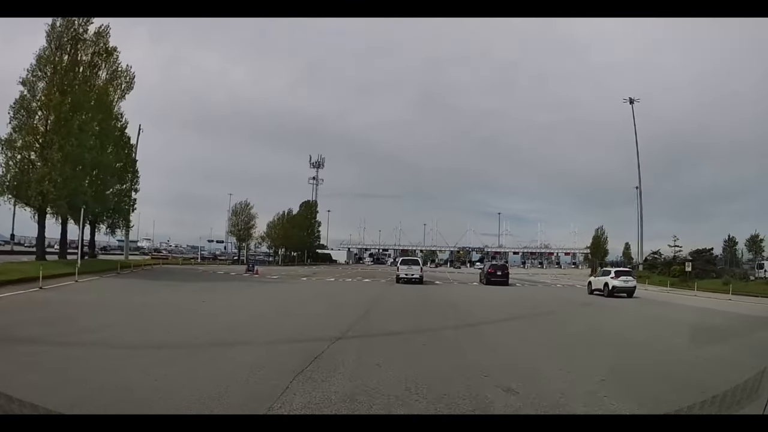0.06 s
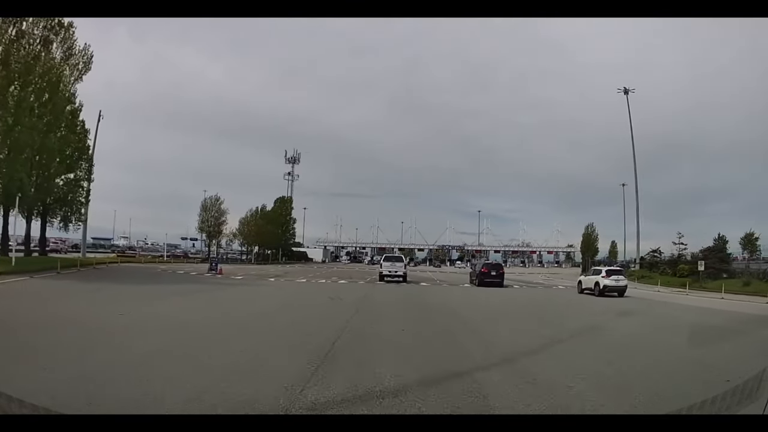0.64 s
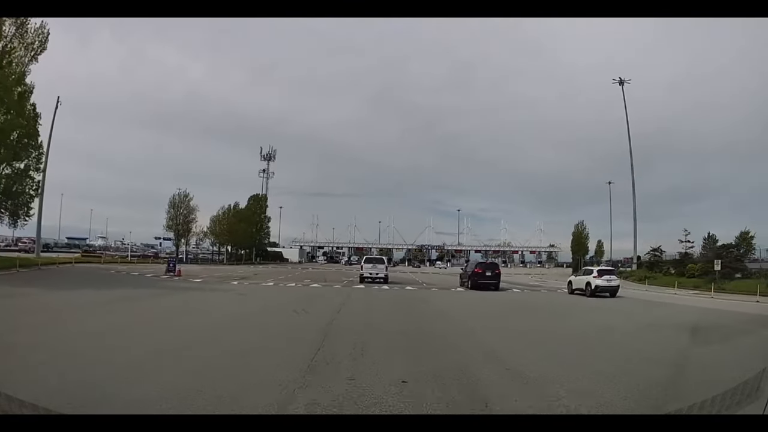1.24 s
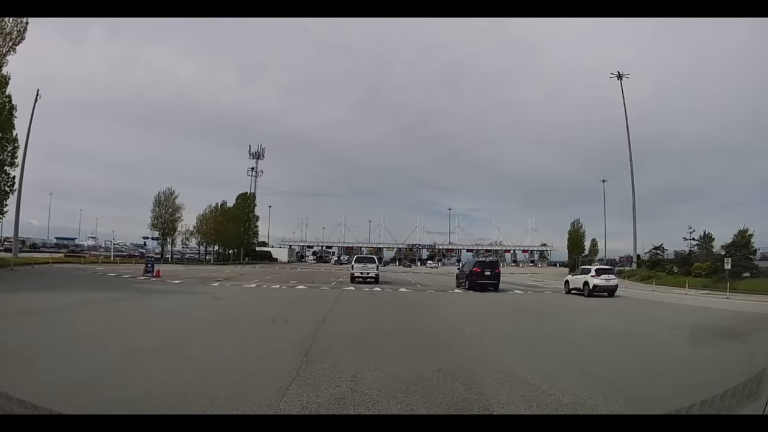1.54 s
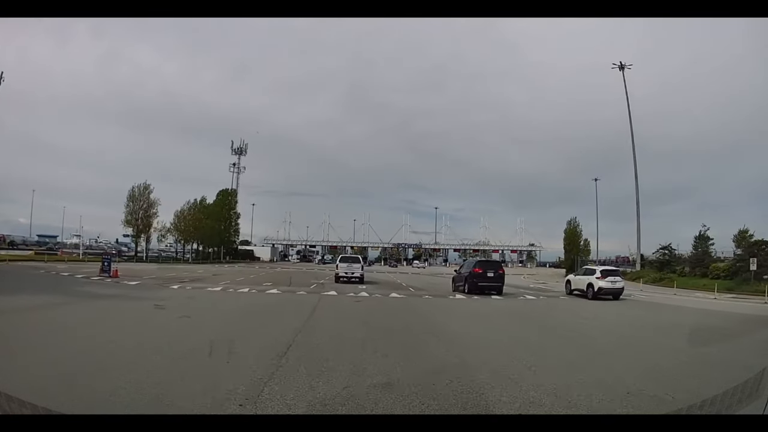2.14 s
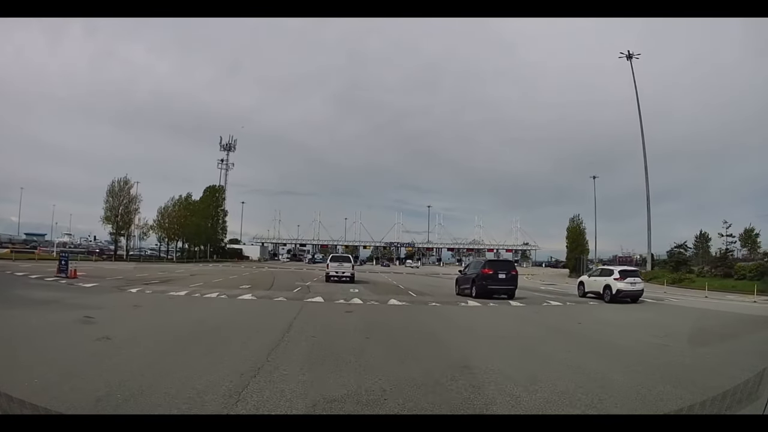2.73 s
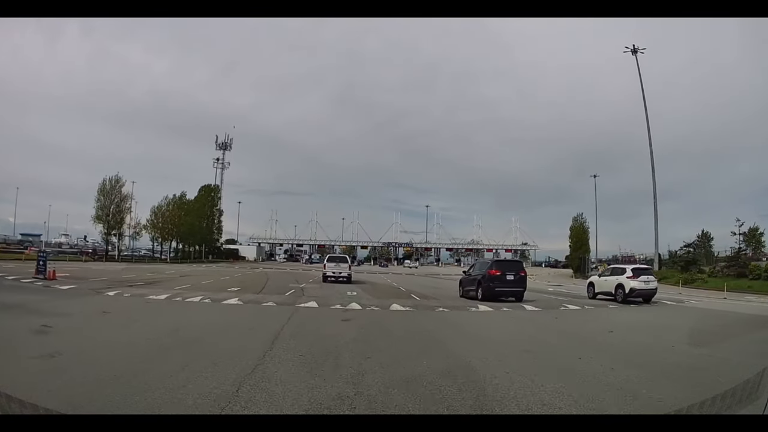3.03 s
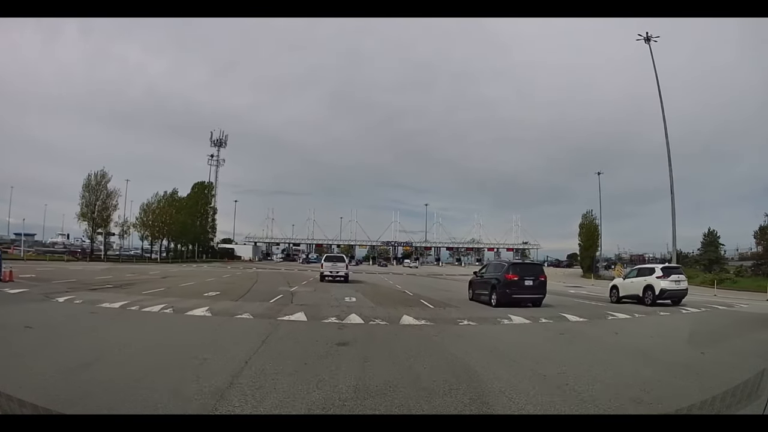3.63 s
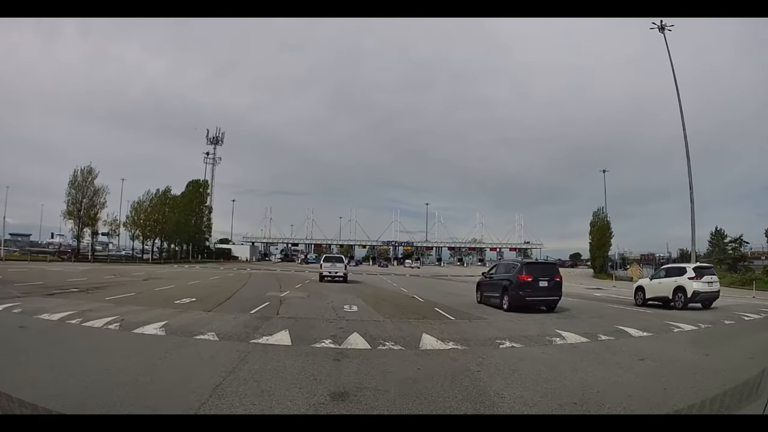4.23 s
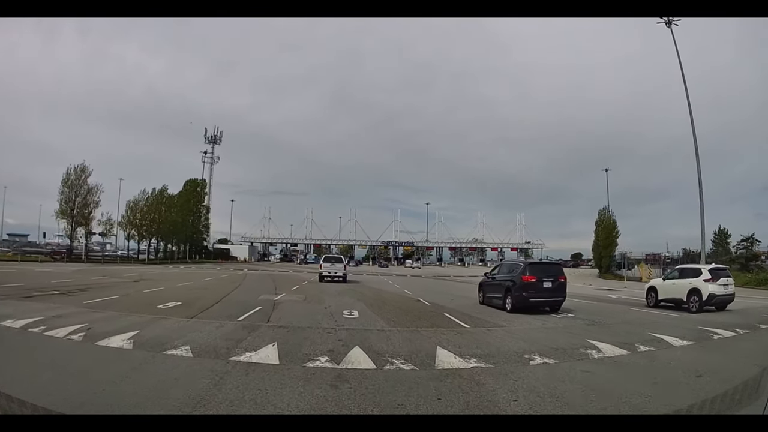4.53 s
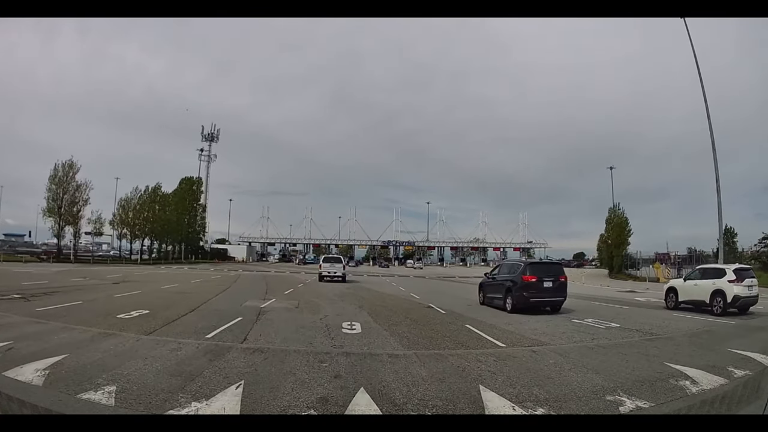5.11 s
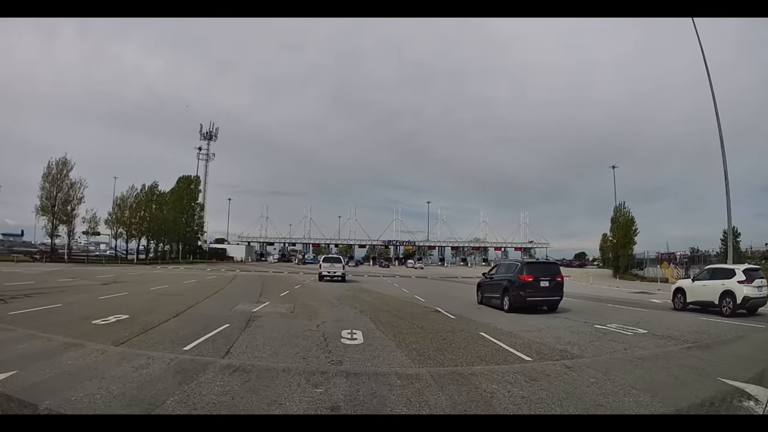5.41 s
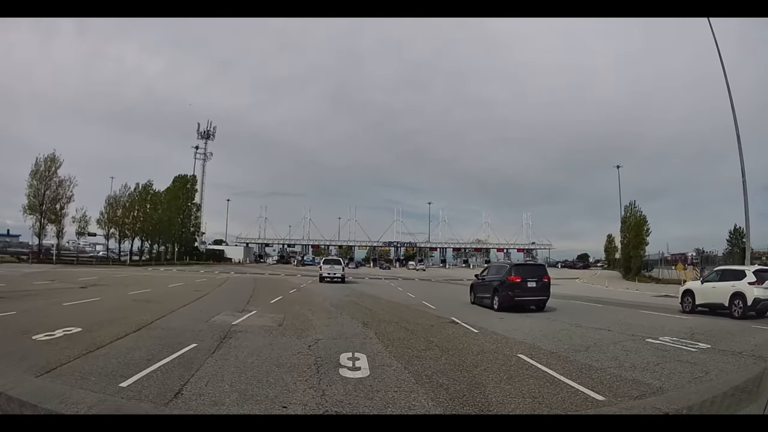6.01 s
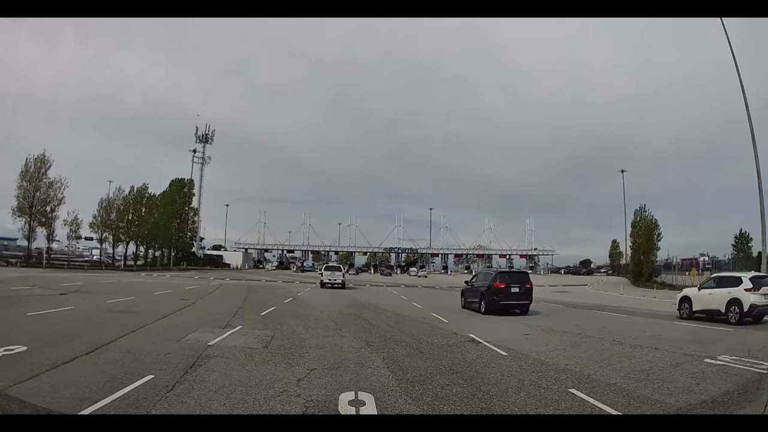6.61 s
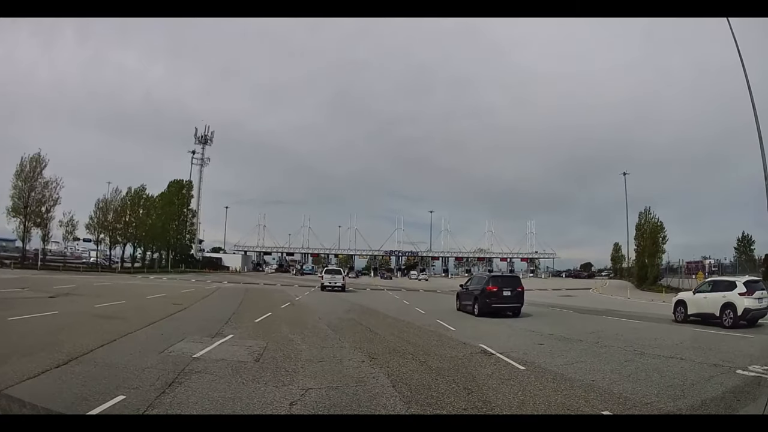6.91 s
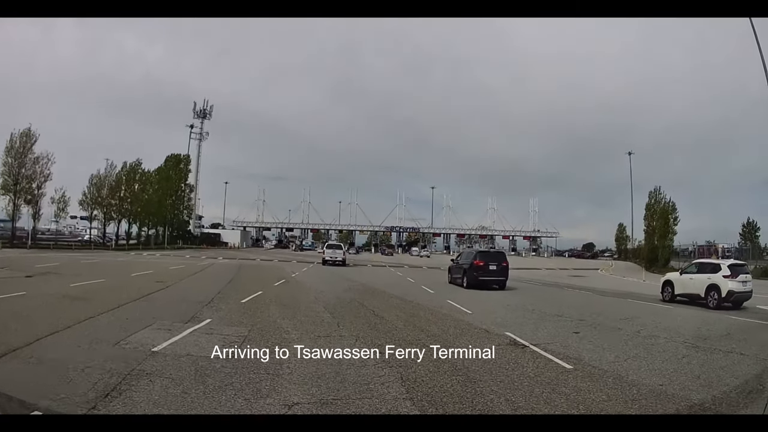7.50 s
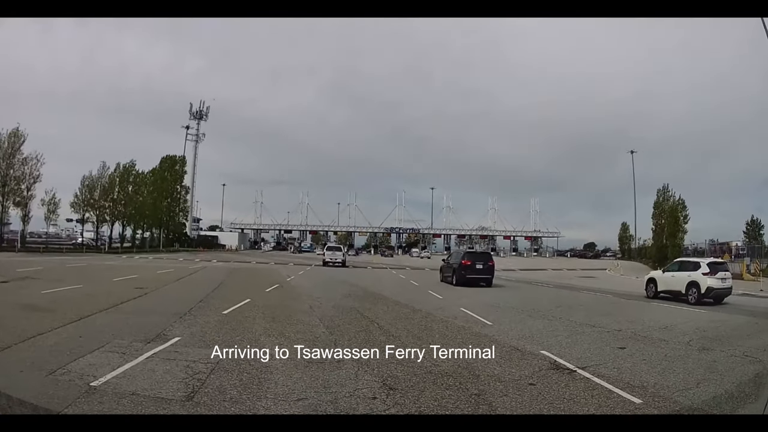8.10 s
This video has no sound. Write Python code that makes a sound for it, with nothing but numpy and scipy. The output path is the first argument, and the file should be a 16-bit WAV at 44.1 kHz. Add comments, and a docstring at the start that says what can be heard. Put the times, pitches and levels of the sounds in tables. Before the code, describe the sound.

Inside a slowing car, road rumble and tyre roar continue, with early bumps and trim rattles and a late booming ridge crossing.

```python
"""Inside a car on worn pavement.

The road rumbles through the body and roars in the tread, over an engine hum and a hiss of air. Bumps on a rough
opening stretch jolt the cabin: trim rubs and loose fittings rattle. A faint gear whine sinks as the car slows.
Late on the whine flares briefly into a husky squeal, then front and rear tyres cross a ridge and their air
booms."""
import sys
import numpy as np
from scipy import signal
from scipy.fft import rfft, irfft, next_fast_len
from scipy.io import wavfile
from scipy.ndimage import map_coordinates

SR = 44100
rng = np.random.default_rng(int(sys.argv[2]) if len(sys.argv) > 2 else 0)


def master_out(mix):
    """Clip the mix to full scale and print it as 16-bit PCM to the path in sys.argv[1]."""
    frames = np.transpose(np.atleast_2d(mix))
    ceiling = np.clip(frames, -1, 1)
    pcm = np.round(ceiling * 32767).astype(np.int16)
    wavfile.write(sys.argv[1], SR, pcm)


N = 368235
TIME = np.arange(N) / SR


def undb(db):
    """Decibels to gain."""
    return 10 ** (np.asarray(db) / 20)


def unit(x):
    """Scale to rms 1."""
    return x / np.sqrt(np.mean(x ** 2))


def curves(table):
    """Interpolate each column over the times in the first, one value a sample."""
    times, *columns = np.transpose(table)
    return [np.interp(TIME, times, column) for column in columns]


def shaped(x, response):
    """Filter by a gain that is a function of frequency; rms 1."""
    size = next_fast_len(N + SR // 2)
    hz = np.maximum(np.arange(size // 2 + 1) * SR / size, 1)
    return unit(irfft(rfft(x, size) * response(hz), size)[:N])


def noise(colour):
    """Noise with a spectrum of (Hz, dB) points; rms 1."""
    hz, db = np.transpose(colour)
    return shaped(rng.standard_normal(N), lambda f: undb(np.interp(np.log(f), np.log(hz), db)))


def walk(rate_hz):
    """Smooth random drift; rms 1."""
    return noise([(rate_hz / 2, 0), (rate_hz, -6), (4 * rate_hz, -90)])


def even(x, span_s):
    """Flatten swells slower than the span; rms 1."""
    power = signal.fftconvolve(x ** 2, signal.windows.hann(max(int(span_s * SR), 8)), "same")
    return unit(x / np.sqrt(np.abs(power) + 1e-9))


def bell(peak_s, half_s):
    """Gaussian swell and fall."""
    return np.exp(-.5 * ((TIME - peak_s) / half_s) ** 2)


def phase(hz):
    """Running phase of a moving frequency, in radians."""
    return 2 * np.pi * np.cumsum(hz) / SR


def tone(hz, waver):
    """Sine whose pitch wavers by a fraction; rms 1."""
    return np.sqrt(2) * np.sin(phase(hz * (1 + waver * walk(39.2))))


# Pavement coarseness. Each row: time in seconds, dB above ordinary asphalt.
COARSENESS = [(0, 9), (0.5, 9), (0.57, 4.5), (0.68, 7.5), (1.0, 4.5), (1.35, 0.5), (2.15, 0), (2.3, -1),
              (2.45, 0.5), (3.45, -1), (3.9, -1), (4.03, -2.5), (4.18, -1), (4.44, -1), (4.5, -3),
              (4.6, -0.5), (5.1, -2), (5.7, -0.5), (5.98, -3.5), (6.2, 2), (6.55, -4), (6.8, 1.5), (7.3, 2),
              (7.8, 7), (8.02, -2), (8.12, 2), (8.35, -2)]
# Cabin hiss spectrum. Each row: frequency in Hz, density in dB.
AIR_SPECTRUM = [(500, 9), (1500, 3.5), (2400, 0), (3100, 0.5), (4000, 0), (5500, -0.4), (7000, -1.5),
                (9000, -5), (12000, -11), (15500, -13)]


def air(level_db=-53):
    """Air hisses in the cabin, a touch louder over coarse pavement."""
    coarse_db, = curves(COARSENESS)
    return noise(AIR_SPECTRUM) * undb(level_db + 0.17 * coarse_db)


# Engine and accessory tones. Each row: frequency in Hz, level in dB.
HUM_TONES = [(87, -66), (108, -55.5), (455, -63), (1005, -67.5), (1044, -69.5)]


def engine_hum(flutter_db=2.5, waver_hz=7):
    """The engine and its accessories hum, each tone wavering in level and pitch."""
    return np.sqrt(2) * sum(undb(db + flutter_db * walk(7)) * np.sin(phase(hz + waver_hz * walk(7.46)))
                            for hz, db in HUM_TONES)


# Road speed as gear pitch. Each row: time in seconds, mesh frequency in Hz.
GEAR_PITCH = [(2.0, 1410), (2.4, 1340), (2.6, 1326), (2.76, 1305), (2.95, 1334), (3.15, 1350), (3.35, 1380),
              (3.72, 1305), (4.0, 1265), (4.5, 1210), (5.6, 1142), (6.75, 1094), (8.35, 1034)]
# Gear whine. Each row: time in seconds, level in dB.
WHINE_LEVEL = [(0, -79), (1.9, -73), (2.25, -65), (2.58, -59), (2.78, -65), (3.05, -67), (3.3, -72),
               (3.6, -62), (3.95, -70), (4.3, -73), (8.35, -67)]


def gear_whine(flutter_db=2.9, waver_hz=11):
    """Meshing gears whine thinly, gliding with the road speed."""
    mesh_hz, = curves(GEAR_PITCH)
    level_db, = curves(WHINE_LEVEL)
    gain = undb(level_db + flutter_db * walk(10))
    return np.sqrt(2) * gain * np.sin(phase(mesh_hz + waver_hz * walk(56)))


def gear_squeal(centre_hz=1092, width_hz=50, level_db=-57.5):
    """The gear whine flares briefly into a husky squeal at the mesh pitch."""
    band = shaped(rng.standard_normal(N), lambda f: 1 / (1 + (2 * (f - centre_hz) / width_hz) ** 2))
    return undb(level_db) * bell(peak_s=6.83, half_s=0.08) * even(band, span_s=0.087)


# Body rumble, tyre drone and tread roar spectra. Each row: frequency in Hz, density in dB.
RUMBLE_SPECTRUM = [(20, -22), (35, -12.5), (60, -4), (85, -1), (110, 1), (140, -5.5), (175, -4.5),
                   (260, -53), (2000, -103)]
DRONE_SPECTRUM = [(100, -35), (165, 0), (200, 1.5), (238, 3), (275, -4), (330, -5.5), (400, -16.5),
                  (700, -20.5), (3000, -90)]
TREAD_SPECTRUM = [(200, -14), (380, -1), (465, 12), (570, 2.5), (700, 7.5), (800, 8), (910, 2), (1030, 3),
                  (1200, 0.5), (1500, -13), (2500, -14), (8000, -41)]


def road(cruise_gear_hz=1435, patchy_db=1.5):
    """Pavement grain shakes the body, drones in the tyres' air and roars in the tread, more at speed."""
    gear_hz, = curves(GEAR_PITCH)
    coarse_db, = curves(COARSENESS)
    speed = gear_hz / cruise_gear_hz
    rumble = even(noise(RUMBLE_SPECTRUM), span_s=0.22) * undb(-38.5 + coarse_db) * speed ** 2.12
    drone = even(noise(DRONE_SPECTRUM), span_s=0.21) * undb(-43 + coarse_db) * speed ** 2.04
    roar = noise(TREAD_SPECTRUM) * undb(-53.5 + 0.87 * coarse_db + patchy_db * walk(29)) * speed ** 0.82
    return rumble + drone + roar


# Loose fittings. Each row: start in seconds, knock level in dB, knock decay in seconds,
# tick level in dB, tick decay in seconds.
RATTLE_HITS = [(0.21, -39.5, 0.033, -52, 0.012), (0.258, -40, 0.032, -62, 0.01),
               (0.277, -39, 0.016, -40, 0.014), (0.303, -31.5, 0.011, -58, 0.012),
               (0.327, -45, 0.015, -55, 0.0065), (7.547, -46, 0.012, -48, 0.014),
               (7.766, -54, 0.03, -62, 0.02), (8.211, -51, 0.02, -48, 0.016)]
# Knock and tick spectra. Each row: frequency in Hz, density in dB.
KNOCK_SPECTRUM = [(500, -42), (1000, 21), (1300, 13), (1600, 7), (2100, 0), (3200, -46), (8000, -47)]
TICK_SPECTRUM = [(1200, -21), (2400, -7), (3100, 2.5), (3800, -3), (5400, -3), (7000, -18), (9000, -12),
                 (14000, -42)]


def rattles(chatter_db=1.0, chatter_hz=400, attack_s=0.0041):
    """Jolted fittings chatter briefly: a hollow plastic knock and a thin, bright tick."""
    def burst(start_s, db, decay_s):
        attack = np.clip((TIME - start_s) / attack_s, 0, 1)
        return undb(db) * attack * np.exp(-np.abs(TIME - start_s) / decay_s)
    knock = sum(burst(start_s, db, decay_s) for start_s, db, decay_s, _, _ in RATTLE_HITS)
    tick = sum(burst(start_s, db, decay_s) for start_s, _, _, db, decay_s in RATTLE_HITS)
    hits = knock * noise(KNOCK_SPECTRUM) + tick * noise(TICK_SPECTRUM)
    return hits * unit(undb(chatter_db * walk(chatter_hz)))


# Trim panel modes. Each row: frequency in Hz, width in Hz, gain in dB.
TRIM_MODES = [(235.4, 29, 4), (318.4, 24, 6), (411, 9.4, 6.5), (454.5, 13, 6), (604, 15, 1), (647, 16, 0.5),
              (803, 27, -12), (983, 22, -13), (1130, 220, -36)]
# Trim rubs. Each row: tightest grip in seconds, level in dB, swell in seconds, tilt in dB per octave.
TRIM_RUBS = [(0.438, -43, 0.023, 1), (0.825, -34, 0.022, -10.5), (0.885, -32.5, 0.025, -4.5),
             (0.935, -32.5, 0.026, 2.5), (0.977, -29.5, 0.022, 0.5), (1.015, -40, 0.013, -4),
             (1.108, -44, 0.024, 5.5), (1.16, -51.5, 0.0079, 5)]


def trim(slip_hz=109.9, jitter=0.16, uneven_db=2, grit=1.16, release_s=0.0195, stiffen=0.04):
    """The body twists and trim rubs: stick-slip pulses and grit ring the panel, swell, then let go."""
    def panel(f):
        return sum(undb(db) / (1 + 1j * (f / hz - hz / f) * hz / (2 * width_hz)) ** 2
                   for hz, width_hz, db in TRIM_MODES)
    slip_count = np.floor(phase(slip_hz * np.exp(jitter * walk(97.1))) / (2 * np.pi))
    slips = unit(np.diff(slip_count, prepend=0) * undb(uneven_db * walk(140)))
    ring = shaped(slips + grit * rng.standard_normal(N), panel)
    grips = []
    for peak_s, db, swell_s, _ in TRIM_RUBS:
        swell = np.exp(-np.abs(TIME - peak_s) / swell_s)
        grips.append(undb(db) * np.where(TIME < peak_s, swell, bell(peak_s, release_s)))
    grip = np.linalg.norm(grips, axis=0)
    pitch_ratio = 1 + stiffen * (grip / grip.max() - .5)  # strain raises the modes
    ring = map_coordinates(ring, [np.cumsum(pitch_ratio)], order=3, mode="mirror")
    shares = np.square(grips) / (grip ** 2 + 1e-18)
    tilted = sum(share * shaped(ring, lambda f: undb(tilt * np.log2(f / 450)))
                 for share, (*_, tilt) in zip(shares, TRIM_RUBS))
    return even(tilted, span_s=0.012) * grip


# Pavement bumps. Each row: peak in seconds, thud in dB, half length in seconds, tread slap in dB,
# boom pitch in Hz, boom in dB.
ROAD_BUMPS = [(0.01, -23, 0.1, -46, 106.3, -28), (0.013, -31, 0.017, -54, 102, -24),
              (0.236, -22.5, 0.012, -47, 89, -36), (0.265, -22, 0.012, -43, 75.8, -18.5),
              (0.298, -20, 0.017, -36.5, 150, -14), (0.362, -24, 0.031, -40.5, 99.6, -17.5),
              (0.43, -21, 0.021, -55, 104.3, -31), (0.702, -23, 0.031, -51, 105, -23.5),
              (0.744, -26.5, 0.019, -48, 199.3, -28), (0.868, -28.5, 0.068, -43, 120.3, -29.5),
              (1.188, -37, 0.012, -63, 122.1, -33), (1.674, -42, 0.05, -56, 92.2, -40.5),
              (1.873, -48, 0.018, -66, 120.7, -33.5), (1.975, -50, 0.043, -68, 76.2, -35.5),
              (2.655, -37, 0.022, -60, 180.7, -36), (3.442, -39.5, 0.063, -54, 106.3, -46),
              (4.155, -39, 0.025, -56, 110.3, -39), (4.383, -44, 0.042, -58, 113, -36),
              (4.462, -44, 0.009, -63, 87.6, -30.5), (4.9, -41.5, 0.023, -64, 108.1, -40.5),
              (5.106, -39.5, 0.03, -61, 102.5, -44), (6.106, -35.5, 0.019, -43.5, 121, -47),
              (6.17, -35.5, 0.028, -57, 124.8, -44), (6.256, -39, 0.022, -72, 102.5, -34.5),
              (6.368, -50, 0.027, -68, 226, -41), (6.443, -43, 0.014, -51, 225.5, -39),
              (7.38, -33.5, 0.059, -48.5, 91.6, -37), (7.748, -37, 0.017, -57, 156.6, -26.5),
              (7.8, -31.5, 0.025, -51, 204, -32), (7.85, -42, 0.042, -62, 117.9, -37.5),
              (8.145, -34.5, 0.037, -63, 111.7, -37.5), (8.247, -38, 0.038, -46, 102.1, -38.5)]
# Body thud and cabin sway spectra. Each row: frequency in Hz, density in dB.
THUD_SPECTRUM = [(18, -51), (38, -11), (52, -0.5), (75, 2.5), (118, 3.5), (165, 1), (220, -6), (320, -12),
                 (450, -16.5), (800, -66), (3000, -83)]
SWAY_SPECTRUM = [(10, -36), (28, -20), (40, 31), (58, -4), (110, -33), (1000, -125)]


def bumps(sway_db=-6.5, hard_thud_db=-22.5):
    """Bumps thud through the springs, make the body boom and slap the tread; hard ones sway the cabin."""
    thuds, slaps, boom = [], [], 0
    for peak_s, thud_db, half_s, slap_db, boom_hz, boom_db in ROAD_BUMPS:
        load = bell(peak_s, half_s)
        thuds.append(undb(thud_db) * load)
        slaps.append(undb(slap_db) * load)
        boom += undb(boom_db) * load * tone(boom_hz, waver=0.031)
    thud_gain = np.linalg.norm(thuds, axis=0)
    slap_gain = np.linalg.norm(slaps, axis=0)
    hardness = thud_gain / undb(hard_thud_db)
    sway = even(noise(SWAY_SPECTRUM), span_s=0.11) * undb(sway_db) * hardness
    thud = even(noise(THUD_SPECTRUM), span_s=0.059)
    return thud_gain * (thud + sway) + boom + slap_gain * noise(TREAD_SPECTRUM)


# Front tyres climb and leave a ridge, then the rear ones cross. Each row: peak in seconds, boom in dB,
# swell in seconds, fade in seconds, overtone in dB, panel ring in dB.
RIDGE_HITS = [(7.455, -17.5, 0.019, 0.018, -29.5, -42), (7.497, -24.5, 0.014, 0.016, -33.5, -35),
              (7.7, -21.5, 0.016, 0.039, -56, -55)]
# Rough cavity overtone spectrum. Each row: frequency in Hz, density in dB.
OVERTONE_SPECTRUM = [(180, -6.5), (240, 4), (320, -6), (420, -7), (620, -20), (900, -19), (1800, -59),
                     (8000, -100)]


def ridge(cavity_hz=222, panel_hz=393):
    """A ridge rings the tyres' air cavities, with a rough overtone and a boxy panel ring."""
    overtone = even(noise(OVERTONE_SPECTRUM), span_s=0.034)
    booms = np.zeros(N)
    for peak_s, boom_db, swell_s, fade_s, overtone_db, panel_db in RIDGE_HITS:
        envelope = bell(peak_s, np.where(TIME < peak_s, swell_s, fade_s))
        cavity = undb(boom_db) * tone(cavity_hz, waver=0.015)
        panel = undb(panel_db) * tone(panel_hz, waver=0.0387)
        booms += envelope * (cavity + undb(overtone_db) * overtone + panel)
    return booms


def scene():
    """All sources at the windscreen, in mono."""
    chassis = road() + bumps() + ridge() + trim() + rattles()
    return (chassis + engine_hum() + gear_whine() + gear_squeal() + air())[None]


def record(dry):
    """Steep low-pass at 15750 Hz."""
    return signal.sosfilt(signal.ellip(10, .2, 80, 15750, fs=SR, output="sos"), dry)


dry = scene()
out = record(dry)
master_out(out)
```